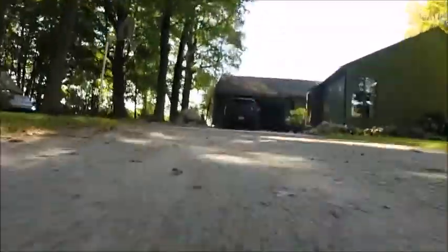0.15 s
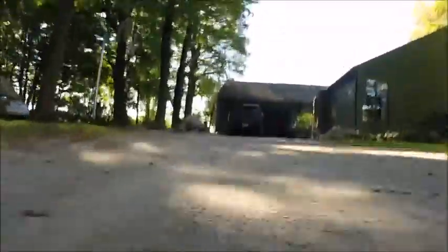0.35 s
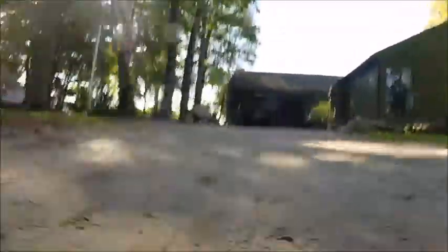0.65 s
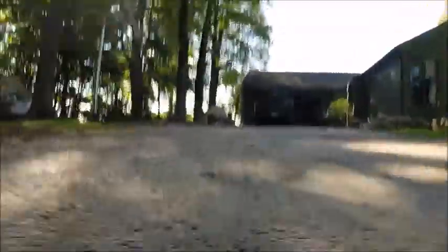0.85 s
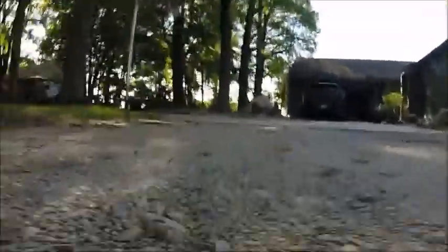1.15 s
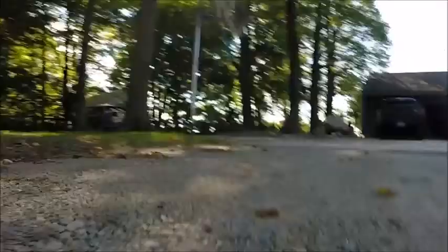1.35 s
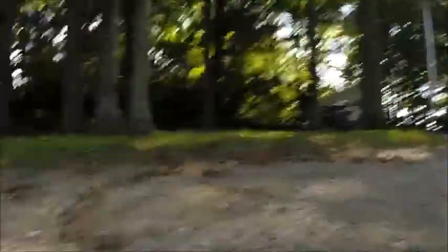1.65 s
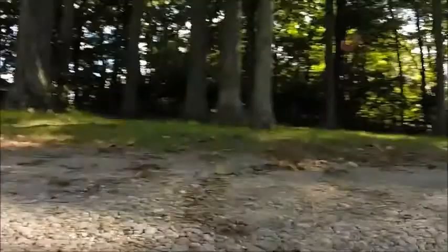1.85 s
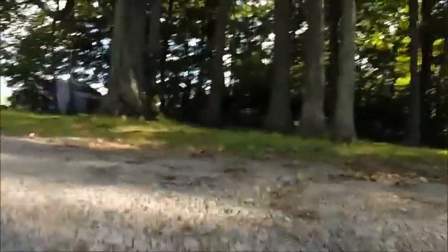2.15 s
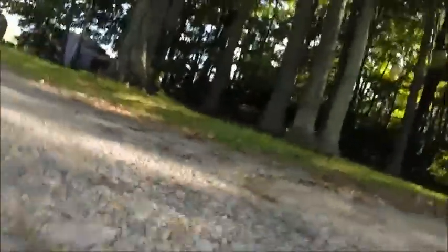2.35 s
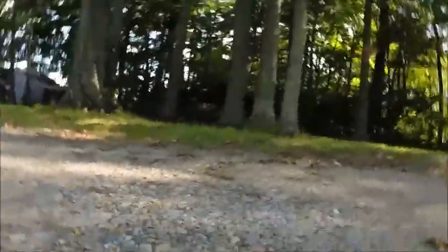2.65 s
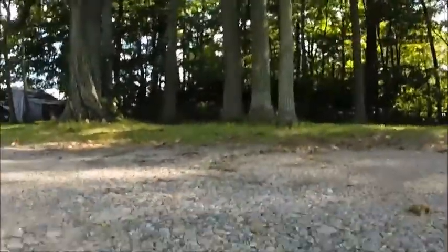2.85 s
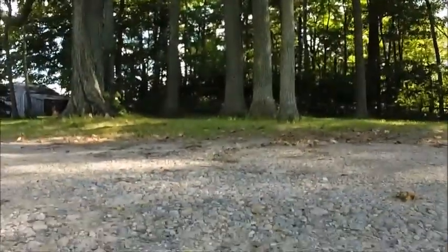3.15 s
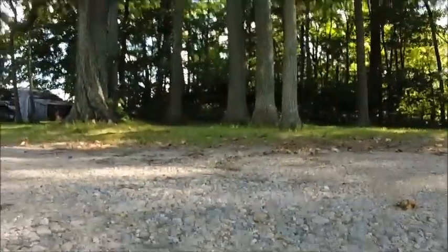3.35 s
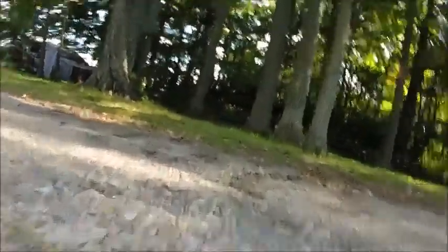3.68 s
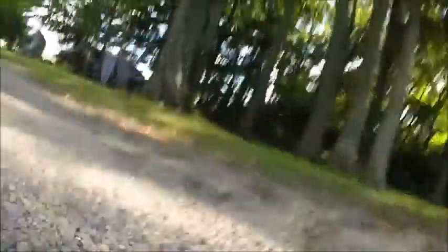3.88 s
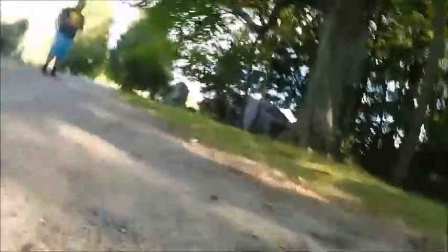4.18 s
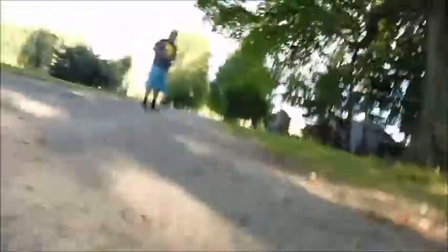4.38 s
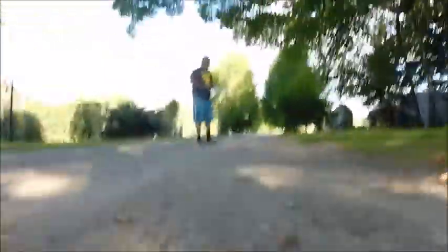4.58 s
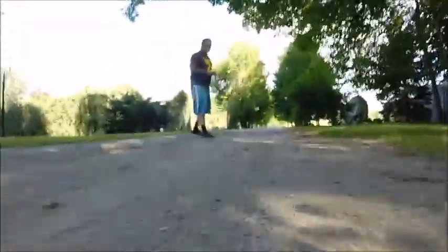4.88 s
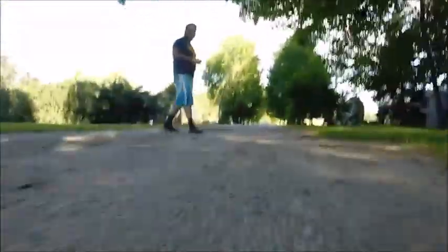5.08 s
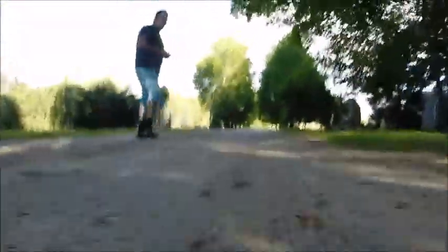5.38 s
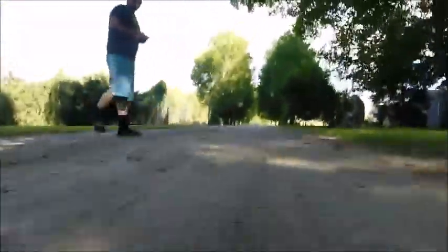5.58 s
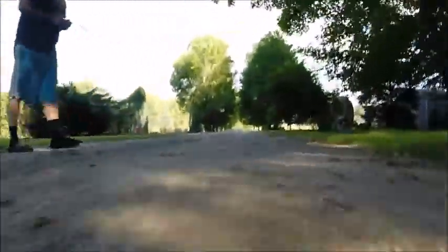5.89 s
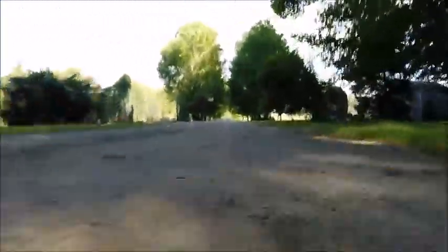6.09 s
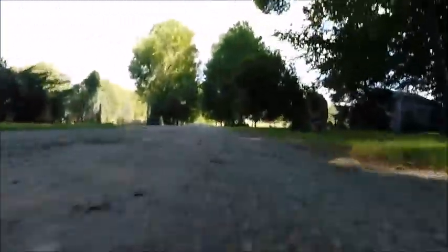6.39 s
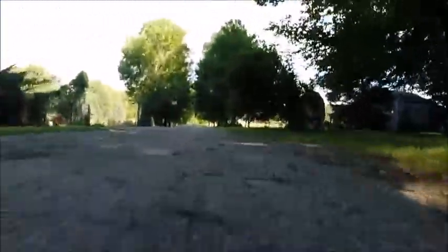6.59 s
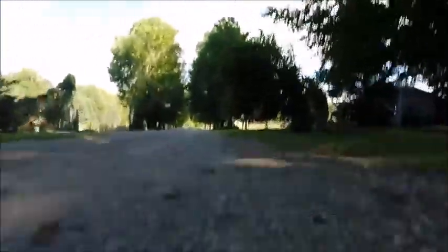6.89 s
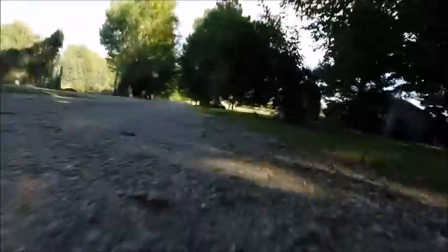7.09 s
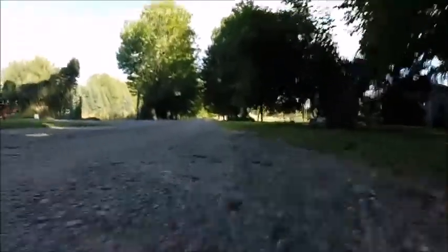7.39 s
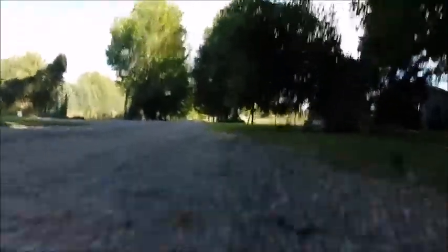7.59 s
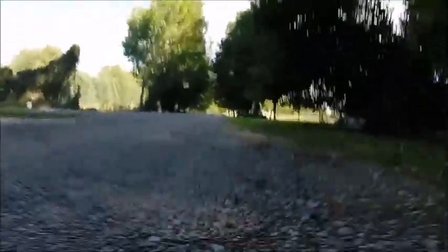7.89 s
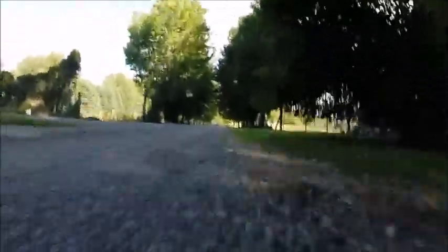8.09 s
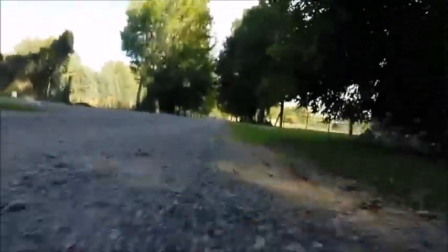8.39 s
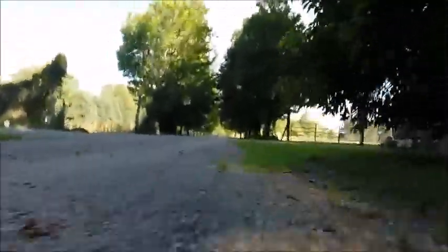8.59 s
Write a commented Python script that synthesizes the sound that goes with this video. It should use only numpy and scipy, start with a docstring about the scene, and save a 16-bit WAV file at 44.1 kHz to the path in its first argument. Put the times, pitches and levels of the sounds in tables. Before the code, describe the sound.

Close rattle and gear whine of a toy car bumping along gravel, briefly coasting, then speeding off with stones pinging its shell.

```python
"""A small electric toy vehicle drives over gravel, heard from a microphone on its body. From the start
the chassis thuds over bumps, tyres knock on stones, flung pebbles set the plastic shell ringing, and
the gears rattle and whine at their mesh frequency. Just before one second, bursts of throttle begin to
spin the wheels; in the turns that follow they slip, and the gears growl and chirp. At three seconds it
rolls almost to rest, then pulls away, slipping again, and runs on with the whine rising in pitch."""
import sys
import numpy as np
from scipy import signal
from scipy.fft import rfft, irfft
from scipy.io import wavfile
from scipy.ndimage import uniform_filter1d

SR = 44100
rng = np.random.default_rng(int(sys.argv[2]) if len(sys.argv) > 2 else 0)


def unload_wav(signal):
    """Save mono or channel-first audio to the path in sys.argv[1] as 16-bit WAV at rate SR, clipped to [-1, 1]."""
    wavfile.write(
        sys.argv[1],
        SR,
        np.round(np.clip(np.atleast_2d(signal).T, -1, 1) * 32767).astype(np.int16),
    )


N = 385434
T = np.arange(N) / SR

# Bumps that rock the chassis: peak_s, level_db
CHASSIS_BUMPS = [(0.048, -2), (.176, -2.5), (0.218, -6.5), (0.263, -1.5), (0.633, -6), (0.963, -3.5),
                 (1.275, -7.5), (1.419, -1.5), (1.74, -3.5), (1.867, 1), (2.797, -6.5), (3.46, 0),
                 (3.879, -0.5), (4.214, -2.5), (5.16, -8.5), (5.652, -6), (6.09, -3.5), (6.199, -3),
                 (6.288, -6), (5.413, -7.5), (8.517, -4.5), (8.727, -4.5)]
# Stones under the tyres: peak_s, level_db
STONE_KNOCKS = [(0.0948, -12), (.174, -20), (0.286, -21), (.365, -12.5), (0.584, -13), (.624, -12),
                (0.826, -9), (1.741, -12.5), (2.187, -17.5), (2.389, -13.5), (2.454, -15.5), (2.494, -9.5),
                (2.795, -16), (2.804, -8.5), (3.525, -18.5), (3.83, -19), (3.848, -13), (3.932, -13.5),
                (4.066, -15), (4.103, -13.5), (4.21, -13), (4.367, -14), (4.386, -9), (4.537, -12),
                (4.615, -18), (4.961, -16.5), (5.504, -8.5), (5.664, -19.5), (6.162, -11), (6.362, -16.5),
                (6.786, -12), (6.89, -7.5), (6.985, -19), (7.127, -14), (7.249, -13), (7.467, -12),
                (7.531, -16), (7.716, -23), (7.928, -16), (7.998, -14.5), (8.152, -17), (8.177, -14.5),
                (8.238, -15.5), (8.384, -19), (8.515, -12.5)]
# Roughness of the ground: time_s, level_db
ROUGHNESS = [(0, -13.5), (.9, -15.5), (1.5, -15.5), (2.0, -21.5), (2.45, -18.5), (2.68, -22.5),
             (2.8, -17.5), (3.6, -18), (3.85, -11), (4.02, -21), (4.25, -14.5), (4.75, -20.5), (5.2, -15),
             (5.7, -18.5), (6.25, -14), (6.45, -20), (6.95, -14), (7.35, -17.5), (8.74, -16.5)]
# Pebbles striking the shell: start_s, level_db, treble_db (hardness), relative_thud_db
PEBBLE_HITS = [(.05, -14.5, 1, -3), (.641, -17, -11, -6.5), (.852, -17, -2, -3), (1.119, -11.5, -1.5, -11),
               (1.204, -14.5, -1, -13), (1.564, -12.5, -1, -10), (1.625, -14, 6, -14),
               (1.757, -12, 0.5, -1), (1.873, -15, -2, -4), (1.923, -15, 10.5, -11), (2.015, -15, -1, -21),
               (2.782, -17, -22, -6), (2.932, -29.5, -38, -6), (3.432, -25, -17, 5), (3.93, -12.5, -27, -6),
               (3.965, -18, -6, -8), (4.136, -9, 2, -9), (4.208, -16, -27, 4), (4.4873, -9.5, -3.5, -2.5),
               (4.585, -11, 2.5, -1), (4.6763, -14, -12, -8), (5.156, -14.5, -37, 1), (5.3063, -11, -1, -7),
               (5.4012, -8.5, 3, -1), (5.483, -15.5, -1, -4), (5.494, -12, -22, 0), (5.562, -11.5, -5, 4.5),
               (6.241, -13, -2, -6), (6.286, -11.5, -39, -2), (6.3282, -9.5, -4, -2.5),
               (6.666, -18.5, -25, 4), (6.838, -12.5, -7, -5), (6.9275, -11.5, -2, -10),
               (7.0122, -12, -10, -9), (7.137, -7, -9, -10), (7.24, -9.5, 0, 1), (7.507, -19, -5, 3),
               (7.612, -10.5, 0.5, -3.5), (7.708, -11, -3, -11), (8.063, -14, 1, 0), (8.315, -8.5, -3, -7),
               (8.711, -12.5, -4, 1)]
# Loose joints clunking as the wheels drop: time_s, level_db
JOINT_CLUNKS = [(.175, -19.5), (.293, -18), (2.548, -24.5), (2.803, -27), (3.44, -24), (4.252, -19.5),
                (4.384, -27), (4.461, -21), (4.536, -23), (4.772, -23.5), (5.243, -20), (5.647, -19),
                (5.868, -21.5), (6.078, -18), (6.89, -24), (7.467, -21.5), (7.491, -18.5), (7.751, -18),
                (7.81, -16.5), (7.997, -18.5), (8.282, -19)]
# Grit striking beside the microphone: start_s, level_db
GRIT_TICKS = [(0.167, -15), (.291, -10.5), (1.396, -20), (1.403, -17.5), (1.422, -16), (1.447, -22),
              (1.492, -26), (1.5023, -13.5), (1.529, -15.5), (1.598, -23), (1.626, -17), (1.647, -20),
              (1.658, -14), (1.743, -18), (2.111, -11), (3.15, -39)]
# Sprays of sand: start_s, length_s, level_db
SAND_SPRAYS = [(.162, 0.011, -27.5), (.182, 0.034, -34), (1.35, .5, -56)]
# Normal modes of the plastic shell: pitch_hz, bandwidth_hz, level_db
SHELL_MODES = [(880, 108, -9), (1420, 110, -11.5), (1440, 308, -7.5), (1690, 111, 2.5), (2213, 119, -7.5),
               (2562, 132, -6), (2900, 91, -10.5), (3400, 73, -17.5), (4175, 59, -19), (4850, 51, -16.5),
               (6260, 67, -23.5), (6950, 160, -37)]

# Running of the motor, before any coasting: time_s, mesh_hz, whine_db
MOTOR_RUN = [(0, 2426, -39.5), (.9, 2283, -70), (1.15, 2351, -47), (2.2, 2417, -51), (2.54, 2250, -48.5),
             (2.72, 2356, -44), (3.5, 2160, -73), (3.74, 2409, -36), (3.95, 2722, -57), (4.3, 2306, -46),
             (4.8, 2426, -44.5), (5.03, 2606, -37), (5.4, 2900, -51), (6.0, 3175, -48), (6.55, 3298, -62),
             (8.74, 3232, -57.5)]
# Partials of the gear train: mesh_ratio, bandwidth_hz, waver_share, throb_share, level_db
GEAR_PARTIALS = [(.59, 90, .014, .3, 0), (1.03, 190, .018, .5, -1), (1.96, 520, .024, 1, -10)]
# Load on the drive train: time_s, level_db
DRIVE_LOAD = [(0, -28.5), (.75, -33.5), (1.1, -33.5), (1.6, -30), (2.2, -35.5), (2.55, -46.5), (3.5, -41.5),
              (3.78, -34), (4.05, -38.5), (4.7, -38), (5.1, -33.5), (5.5, -35.5), (6.15, -30.5),
              (6.42, -38), (6.9, -32), (7.35, -38), (8.5, -35)]
# Coasting with the throttle lifted: start_s, length_s
THROTTLE_LIFTS = [(0.962, 0.061), (1.878, 0.063), (2.512, 0.051), (2.83, .598)]
# Bursts of throttle: start_s, length_s, level_db
THROTTLE_BURSTS = [(.67, 0.075, -50), (.81, 0.043, -43), (.9, 0.055, -42.5), (1.08, 0.28, -48.5),
                   (1.36, 0.502, -46), (1.95, 0.33, -49)]
# Wheel slip in the turns: start_s, length_s, growl_db
WHEEL_SLIPS = [(1.06, 0.26, -36.5), (1.5, 0.41, -43.5), (2.15, 0.32, -35), (2.575, 0.19, -32),
               (3.43, 0.18, -32.5), (3.62, 0.24, -24.5), (3.93, 0.17, -45)]
# Gear chirps as the slipping tyres catch: centre_s, pitch_hz, glide_hz_per_s, level_db
GEAR_CHIRPS = [(1.3, 1630, -2000, -16.5), (2.695, 1503, -7000, -20), (2.737, 1742, 4000, -22.5),
               (2.784, 1713, 3000, -21), (3.586, 1707, -4000, -17.5), (3.65, 1687, 3000, -18.5),
               (3.733, 949, 0, -20), (3.776, 920, -1, -20.5), (3.778, 1407, 2000, -17),
               (3.9, 1413, -2, -20.5), (4.021, 1742, -5000, -23.5), (4.083, 1770, -3500, -23)]

# Spectral envelopes: frequency_hz, relative_db
RUMBLE_SPECTRUM = [(8, -17), (48, -5), (68, -3), (100, -3), (138, -0.5), (170, -5), (210, -13.5),
                   (280, -23), (500, -40), (1500, -94)]  # chassis on rough ground
PATTER_SPECTRUM = [(120, -36), (250, 0.5), (300, -8), (360, 7.5), (450, -4), (560, -3.5), (720, 4),
                   (900, -4.5), (1120, -17.5), (2000, -11), (5000, -68.5)]  # grit under the tread
MOUNT_RESPONSE = [(450, -12.5), (930, 4), (1400, 6.5), (1700, 0), (2050, 6.5), (2500, -1)]  # path from gearbox to shell
RASP_SPECTRUM = [(1400, -14.5), (2100, 8), (3600, -13), (4250, -1.5), (4500, -13), (4750, 5), (5300, -19.5),
                 (6300, -13), (10000, -52)]  # scraping gear teeth
SAND_SPECTRUM = [(2000, 2.5), (6000, 1), (9000, -5.5), (12000, -8), (15000, -15)]  # spraying sand
GRIT_SPECTRUM = [(1000, 8), (2400, 24.5), (3500, 3), (4700, 12), (5400, -0.5), (6300, 11), (8000, -9.5),
                 (11500, -7), (14000, -18.5), (16000, -24)]  # one snap of grit
RUBBING_SPECTRUM = [(1500, -22.5), (3000, 11.5), (3700, 3), (4200, 9.5), (4850, -1), (5400, 0.5),
                    (6300, 3.5), (6900, -11), (7300, -2), (7900, -13.5), (10000, -20), (12500, -29),
                    (15500, -46.5)]  # rubbing gear teeth
FIZZ_SPECTRUM = [(3500, -25), (4200, 8), (4780, 8.5), (5500, -7), (6300, 14), (6850, -3), (7300, 11.5),
                 (7900, -5), (8500, 4), (9500, -9), (11000, -21), (15000, -33)]  # motor brushes
IDLE_SPECTRUM = [(12, 16.5), (45, -3.5), (75, 2.5), (110, 2), (160, 18.5), (260, -11.5), (390, -2.5),
                 (1100, -16), (1650, -8.5), (2800, -29), (6500, -34), (9000, -46.5)]  # low steady rush

THROTTLE_EDGES_S, SLIP_EDGES_S = (.036, .0029), (.082, .043)  # attack, release


def chassis(jolts, boom_hz=127, rise_s=.00577):
    """Forced vibration: the sprung body rumbles over rough ground and thuds at the larger bumps."""
    rumble = colour(grains(per_s=400, spread_db=2), RUMBLE_SPECTRUM)
    out = evened(rumble * amp(2 * jolts)) * amp(shaking_db() - 1)
    for s, db in CHASSIS_BUMPS:
        add(out, s - rise_s, amp(db) * push(boom_hz * rng.uniform(1, 1.1), rise_s, glide=.026))
    return out


def tyres(jolts, knock_hz=670, rise_s=.00192, roughness_power=1.51):
    """Impact noise: grit patters, harder at speed; stones give hollow knocks and jar the shell."""
    patter = evened(colour(grains(per_s=260, spread_db=4.5), PATTER_SPECTRUM))
    stones = sum(excite(grains(per_s=7, spread_db=4.5), push(hz, rise_s=1.3 / hz))
                 for hz in np.geomspace(290, 840, num=8))
    speed_db = 10 * (mesh_hz() / mesh_hz().mean() - 1)
    out = evened((patter + evened(stones)) * amp(2.05 * jolts))
    out *= amp(roughness_power * shaking_db() + speed_db - 6)
    for s, db in STONE_KNOCKS:
        add(out, s - rise_s, amp(db + .5) * push(knock_hz * rng.uniform(.77, 1.164), rise_s))
        add(out, s - rise_s, amp(db - 10) * clunk())
    return out


def pebbles(contact_s=.000751, thud_hz=600, boom_hz=100):
    """Impulse excitation: each pebble rings the shell, cracks, thuds and clunks on the rebound."""
    out, t = np.zeros(N), np.arange(300) / SR
    for s, db, treble_db, thud_db in PEBBLE_HITS:
        force = .18 * rng.standard_normal(len(t)) * t / contact_s * np.exp(-t / contact_s)
        force[round(contact_s * SR)] += 1  # a sharp blow within the scuff
        ring = shell_ring(treble_db, scatter_db=2.5, detune=.025, damping=1.5)
        add(out, s, amp(db) * unit_peak(np.convolve(force, ring), size=110))
        add(out, s + rng.uniform(.002, .005), amp(db - 8) * clunk())
        add(out, s, amp(db + treble_db - 11) * muffled(tick(decay_s=.00095)))
        add(out, s, amp(db + thud_db) * push(thud_hz * rng.uniform(.78, 1.4), rise_s=.00096))
        add(out, s, -amp(db - 6) * push(boom_hz * rng.uniform(.7, 1.3), rise_s=.0049))
    return out


def gear_rattle(jolts):
    """Backlash: loose teeth chatter into the shell's modes, louder under load."""
    teeth = evened(grains(per_s=2200, spread_db=-1) * amp(2 * wander(hz=44.5)))
    rattle = excite(teeth * amp(jolts), shell_ring(treble_db=-1))
    return evened(rattle) * amp(effort_db() - 4.5)


def gear_growl(whirr_db=-48, teeth=5):
    """A pulse train, one knock per uneven shaft turn, whirrs softly and growls during wheel slip."""
    leap, shudder = .08 * wander(hz=18), .04 * wander(hz=250)
    turns = cycles(mesh_hz() / teeth * (1 + leap + shudder))
    knocks = np.diff(np.floor(turns), prepend=0) * (1 + .4 * rng.standard_normal(N))
    growl = colour(excite(knocks, shell_ring(treble_db=-18)), MOUNT_RESPONSE)
    gain = amp(whirr_db) + amp(1) * bursts(WHEEL_SLIPS, *SLIP_EDGES_S)
    return evened(growl * amp(3.8 * wander(hz=30))) * gain


def gear_whine(shudder=.012, flutter_db=2.5):
    """Modulation: narrow noise bands track the mesh frequency and throb with each turn of a slow gear."""
    mesh = mesh_hz() * (1 + shudder * wander(hz=75.8))
    slow_gear = np.cos(2 * np.pi * cycles(mesh / 48 * (1 + .15 * wander(hz=25))))
    out = np.zeros(N)
    for ratio, width, waver, throb, db in GEAR_PARTIALS:
        turns = cycles(ratio * mesh * (1 + waver * wander(hz=70)))
        band = wander(width / 2) + 1j * wander(width / 2)
        envelope = evened(amp(flutter_db * wander(hz=70)) * (1 + throb * slow_gear))
        out += amp(db) * (band * envelope * np.exp(2j * np.pi * turns)).real
    return out * amp(curve(MOTOR_RUN, 2) + coasting_db())


def gear_chirps(length_s=.031, waver=.024):
    """Frequency glides: as the tyres catch, the gears give short tones that swell and die."""
    out, window = np.zeros(N), signal.windows.hann(round(length_s * SR))
    t = np.arange(len(window)) / SR - length_s / 2
    for s, hz, glide, db in GEAR_CHIRPS:
        bend = evened(uniform_filter1d(rng.standard_normal(len(window)), size=200))
        add(out, s - length_s / 2, amp(db) * window * sine(hz * (1 + waver * bend) + glide * t))
    return out


def wheelspin(level_db=9):
    """Swept resonance: wheels spin and grip under throttle, moving a gear tone across the shell's modes."""
    hz = .88 * mesh_hz() * (1 + .17 * wander(hz=16) + .03 * wander(hz=150))
    tone = excite(sine(hz), shell_ring(treble_db=6, damping=2.2))
    return evened(tone) * amp(level_db) * bursts(THROTTLE_BURSTS, *THROTTLE_EDGES_S)


def gear_rasp(level_db=-15):
    """Sliding friction: while the wheels slip, loaded teeth scrape in rough, surging spurts."""
    scrape = grains(per_s=3000, spread_db=2) * amp(3.5 * wander(hz=150) + 3 * wander(hz=20))
    return evened(colour(scrape, RASP_SPECTRUM)) * amp(level_db) * bursts(WHEEL_SLIPS, *SLIP_EDGES_S)


def joints(jolts, count=14):
    """Mechanical play: loose joints rattle, each with its own ring; a few clunks stand out."""
    rattle = sum(excite(grains(per_s=5, spread_db=2.5) * amp(2 * jolts), clunk()) for _ in range(count))
    out = evened(rattle) * amp(effort_db() - 5)
    for s, db in JOINT_CLUNKS:
        add(out, s - .001, amp(db) * clunk())
    return out


def gravel(tilt_db_per_octave=2):
    """Modal excitation: gravel crunches in clusters, each grain pinging one slightly detuned shell mode."""
    out, t = np.zeros(N), np.arange(900) / SR
    clusters = amp(3 * wander(hz=25))
    for hz, width, db in SHELL_MODES + SHELL_MODES:  # two spots for each mode
        envelope = np.sqrt(width) * np.exp(-2 * np.pi * width * t)
        ping = envelope * np.sin(2 * np.pi * hz * rng.uniform(.96, 1.03) * t)
        impacts = grains(per_s=24, spread_db=4.5) * clusters
        octaves = np.log2(hz / SHELL_MODES[0][0])
        out += amp(db + tilt_db_per_octave * octaves) * excite(impacts, ping)
    return evened(muffled(out)) * amp(effort_db() - 6)


def sand():
    """Shot noise: sand sprays and ticks by the microphone; under throttle the wheels throw up more."""
    spray = evened(colour(grains(per_s=2500, spread_db=3), SAND_SPECTRUM))
    crunch = evened(sum(excite(grains(per_s=25, spread_db=3), tick()) for _ in range(8)))
    out = spray * bursts(SAND_SPRAYS, attack_s=.0025, release_s=.0084)
    out += crunch * amp(2) * bursts(THROTTLE_BURSTS, *THROTTLE_EDGES_S)
    for s, db in GRIT_TICKS:
        add(out, s, amp(db) * tick())
    return out


def hiss():
    """Contact noise: gear teeth rub finely, and the motor's brushes fizz under throttle."""
    flicker = amp(3.5 * wander(hz=44.4))
    sparks, rubs = grains(per_s=6000, spread_db=1.5), grains(per_s=8000, spread_db=2)
    teeth = evened(colour(rubs * flicker, RUBBING_SPECTRUM)) * amp(effort_db() - 15)
    fizz = evened(colour(sparks * flicker, FIZZ_SPECTRUM)) * amp(-2)
    return teeth + fizz * bursts(THROTTLE_BURSTS, *THROTTLE_EDGES_S)


def idle(rush_db=-41, tone_hz=1430, tone_db=-53):
    """Masking: a low rush and a faint electric whine run throughout, laid bare during coasting."""
    tone = sine(tone_hz * (1 + .018 * wander(hz=56.7)))
    flutter = amp(3.5 * wander(hz=18))
    rush = colour(rng.standard_normal(N), IDLE_SPECTRUM)
    return amp(rush_db) * evened(rush) + amp(tone_db) * evened(tone * flutter)


def shell_ring(treble_db, scatter_db=0, detune=0, damping=1):
    """Modal superposition: the shell's impulse response, varying with hardness and the spot struck."""
    t = np.arange(2000) / SR
    hz, width, db = np.array(SHELL_MODES).T[:, :, None]
    treble_share = np.clip(np.log2(hz / 1700) / 1.3, 0, 1)
    db = db + treble_db * treble_share + scatter_db * rng.standard_normal(hz.shape)
    hz, width = hz * (1 + detune * rng.standard_normal(hz.shape)), width * damping
    sign = (-1) ** np.arange(len(hz))[:, None]
    modes = sign * amp(db) * width * np.exp(-np.pi * width * t) * np.sin(2 * np.pi * hz * t)
    return muffled(modes.sum(0))


def clunk(contact_s=.00096, hollow_hz=680):
    """Damped resonance: a plastic joint scuffs home, ringing the shell dully over a hollow note."""
    u = np.arange(400) / (contact_s * SR)
    ring = shell_ring(treble_db=-20, scatter_db=4, detune=.04)
    scuff = rng.standard_normal(len(u)) * u * np.exp(-u)
    out = unit_peak(signal.fftconvolve(scuff, ring), size=110)
    add(out, 0, amp(-3) * push(hollow_hz * rng.uniform(.64, 1.208), rise_s=.0013))
    return out


def push(hz, rise_s, glide=0):
    """Elastic contact: a soft blow swells and dies; glide lifts its pitch as rubber stiffens."""
    u = np.arange(round(7 * rise_s * SR)) / (rise_s * SR)
    return (u * np.exp(1 - u)) ** 2.15 * sine(hz * (1 + glide * np.tanh(u - 1)))


def tick(decay_s=.0017):
    """A broadband transient: one snap of grit, with a colour of its own."""
    t = np.arange(900) / SR
    spectrum = [(hz, db + 3.5 * rng.standard_normal()) for hz, db in GRIT_SPECTRUM]
    return unit_peak(colour(rng.standard_normal(len(t)) * np.exp(-t / decay_s), spectrum), size=60)


def muffled(x):
    """Transmission loss: the plastic body passes little of the highest treble."""
    return signal.sosfilt(signal.butter(4, 7200, fs=SR, output="sos"), x)


def coasting_db(floor_db=-16, run_down_s=.08, pick_up_s=.0035):
    """Exponential relaxation: the drive runs down at each throttle lift, then picks up at once."""
    drop = np.zeros(N)
    for s, length in THROTTLE_LIFTS:
        drop += (1 - decay(s, run_down_s)) * decay(s + length, pick_up_s)
    return floor_db * drop


def mesh_hz(sag_per_db=.0578):
    """Mesh frequency: the rate at which teeth engage, sagging while the vehicle coasts."""
    return curve(MOTOR_RUN, 1) * (1 + sag_per_db * coasting_db())


def effort_db():
    """Load: how hard the gears work."""
    return curve(DRIVE_LOAD, 1) + coasting_db()


def shaking_db():
    """Base excitation: how hard the ground shakes the wheels."""
    return curve(ROUGHNESS, 1) + .91 * coasting_db()


def bursts(rows, attack_s, release_s):
    """Summed envelopes: linear attack, hold, exponential release."""
    return sum(amp(db) * np.clip((T - s) / attack_s, 0, 1) * decay(s + length, release_s)
               for s, length, db in rows)


def decay(start_s, time_constant_s):
    """Unity until start_s, then exponential decay."""
    return np.exp(-np.maximum(T - start_s, 0) / time_constant_s)


def grains(per_s, spread_db):
    """A Poisson process: tiny impacts of random sign and size."""
    size = amp(spread_db * np.minimum(rng.exponential(1, N), 4))
    return size * rng.choice([-1, 1], N) * (rng.random(N) < per_s / SR)


def wander(hz):
    """Random fluctuation of unit rms, low-passed at hz."""
    rolloff = 1 + (np.fft.rfftfreq(N, 1 / SR) / hz) ** 4
    return evened(irfft(rfft(rng.standard_normal(N)) / rolloff, N))


def colour(x, points):
    """Minimum-phase filtering by a spectral envelope."""
    hz, db = np.transpose(points)
    log_hz = np.log(abs(np.fft.fftfreq(8192, 1 / SR)) + 1)
    log_gain = np.log(amp(np.interp(log_hz, np.log(hz), db)))
    taps = np.fft.ifft(np.exp(signal.hilbert(log_gain).conj())).real[:4096]
    return excite(x, taps)


def excite(force, response):
    """Convolution of a force with an impulse response."""
    return signal.oaconvolve(force, response)[:len(force)]


def cycles(hz):
    """Phase in cycles: the integral of frequency."""
    return np.cumsum(hz) / SR


def sine(hz):
    """A sinusoid of varying frequency."""
    return np.sin(2 * np.pi * cycles(hz))


def curve(rows, column):
    """Linear interpolation of a column over time."""
    rows = np.array(rows)
    return np.interp(T, rows[:, 0], rows[:, column])


def add(mix, s, sound):
    """Superposes a sound at time s."""
    part = mix[max(round(s * SR), 0):][:len(sound)]
    part += sound[:len(part)]


def unit_peak(x, size):
    """Gives the loudest run of size samples the power of a unit sine."""
    return x / np.sqrt(2 * uniform_filter1d(x ** 2, size, mode="constant").max() + 1e-20)


def evened(x):
    """Normalises to unit rms."""
    return x / np.sqrt(np.mean(x ** 2) + 1e-20)


def amp(db):
    """Decibels to amplitude ratio."""
    return 10 ** (np.asarray(db) / 20)


def scene():
    """Structure-borne sound, with no room; the same jolts shake gears, chassis, tyres and joints."""
    jolts = wander(hz=15.5)
    drive = gear_rattle(jolts) + gear_growl() + gear_chirps() + gear_whine()
    drive += wheelspin() + gear_rasp() + hiss() + idle()
    return (chassis(jolts) + tyres(jolts) + joints(jolts) + pebbles() + gravel() + sand() + drive)[None]


def record(dry, ceiling=.79, cutoff_hz=15800):
    """Soft saturation rounds the largest peaks; the ends are tapered and the band is limited."""
    rounded = dry / (1 + (dry / ceiling) ** 6) ** (1 / 6)
    tapered = rounded * signal.windows.tukey(N, .0006)
    low_pass = signal.firwin(255, cutoff_hz, window=("kaiser", 9), fs=SR)
    return signal.oaconvolve(tapered, low_pass[None], "same")


dry = scene()
out = record(dry)
unload_wav(out)
```